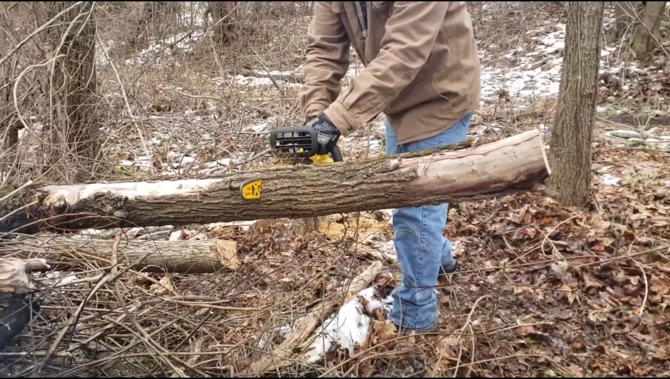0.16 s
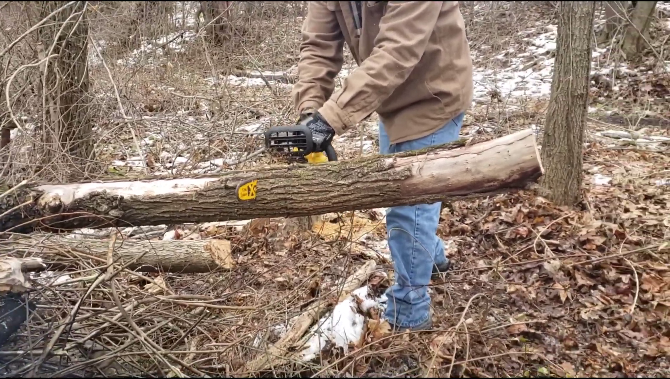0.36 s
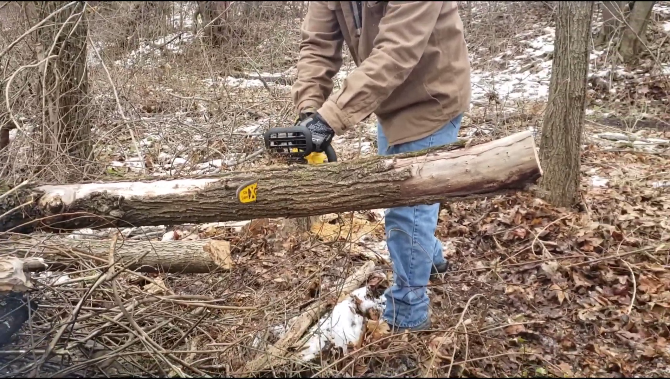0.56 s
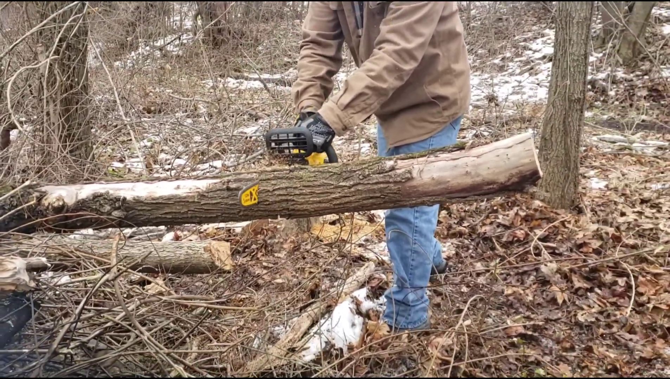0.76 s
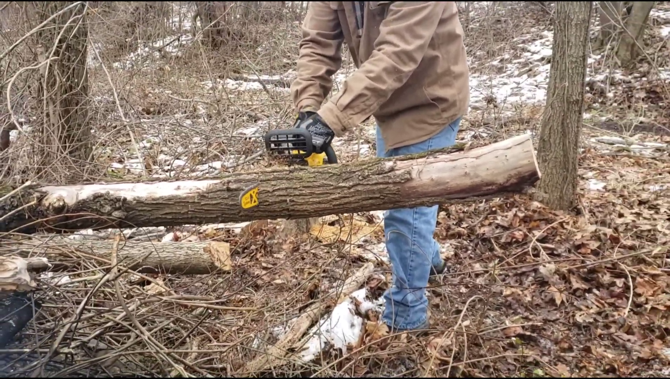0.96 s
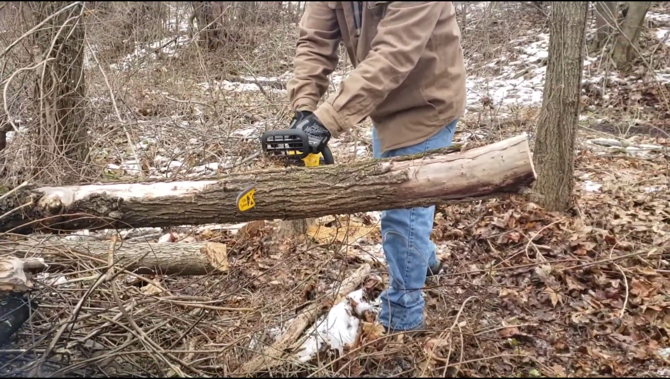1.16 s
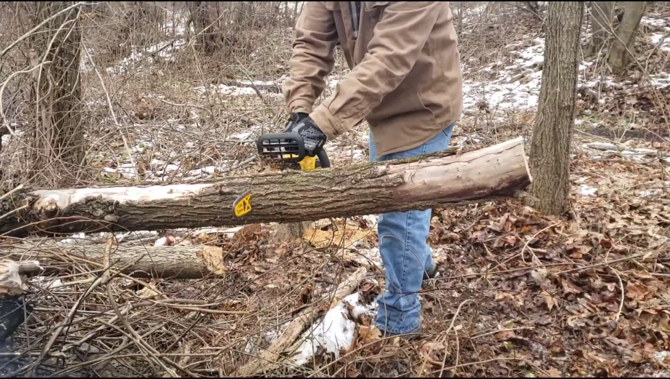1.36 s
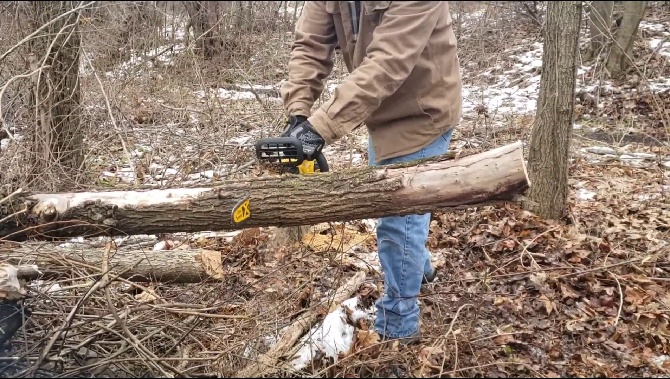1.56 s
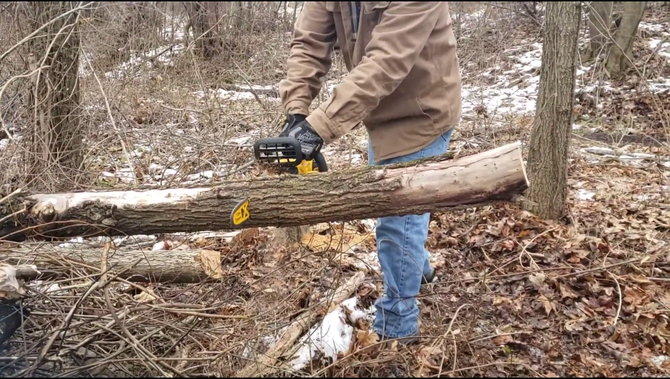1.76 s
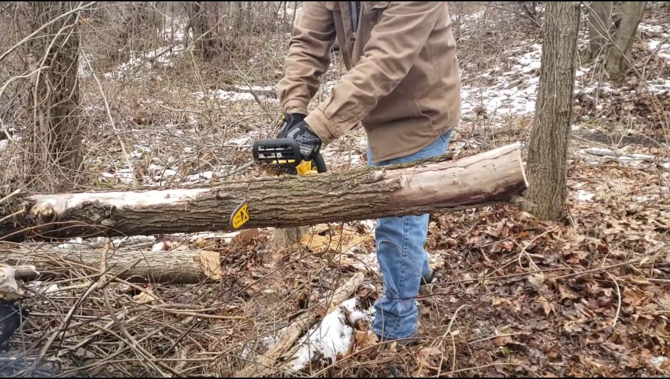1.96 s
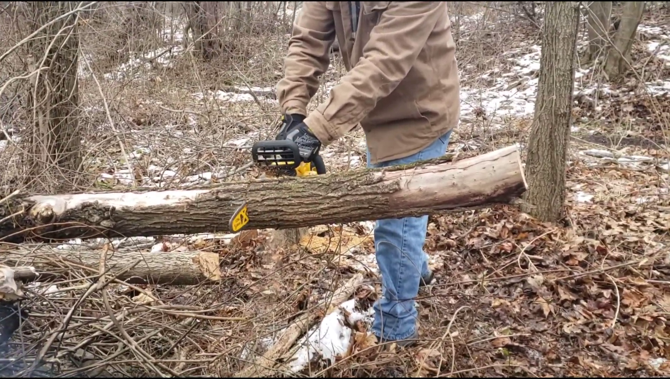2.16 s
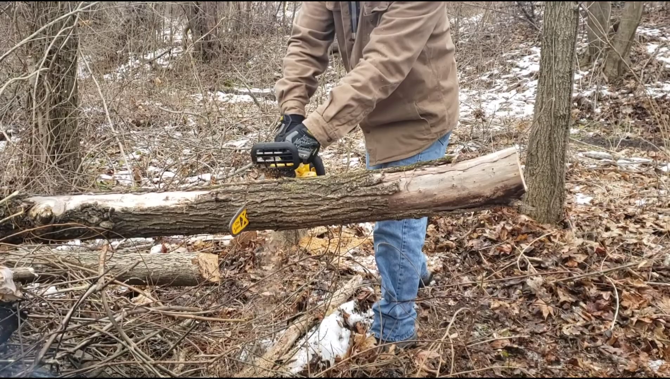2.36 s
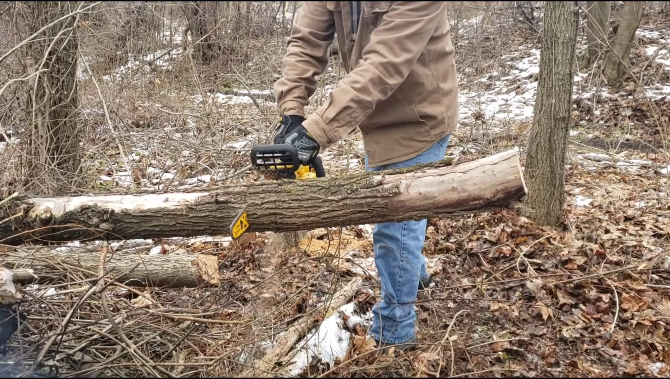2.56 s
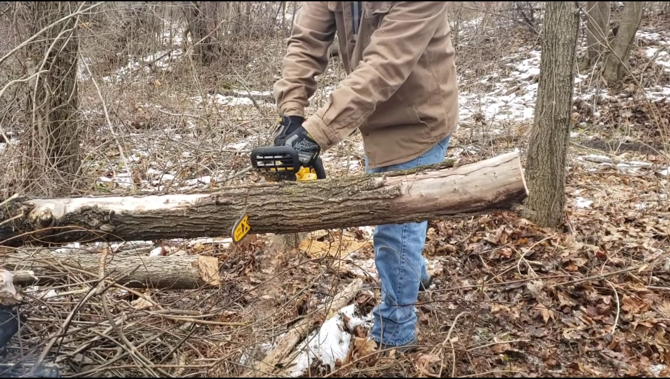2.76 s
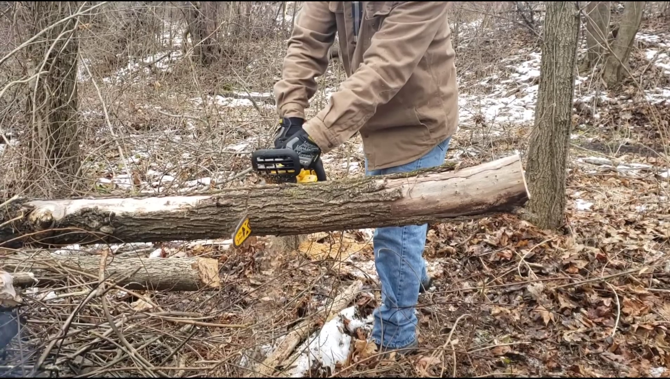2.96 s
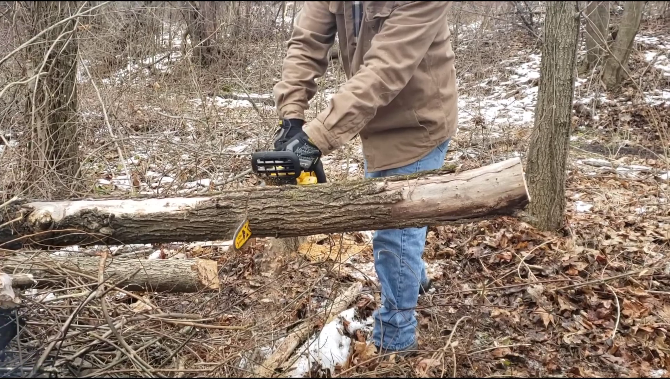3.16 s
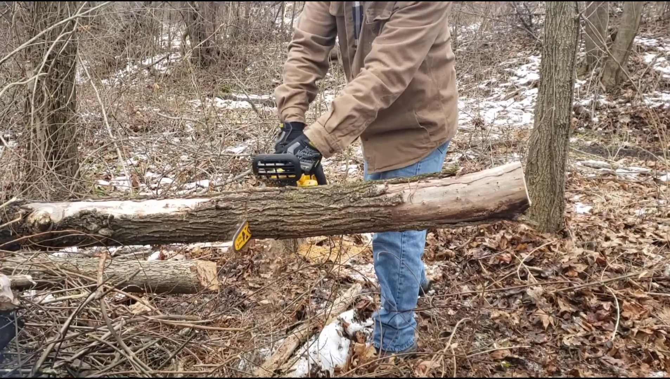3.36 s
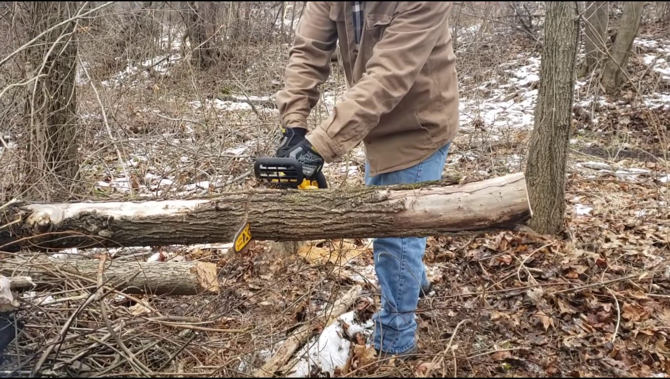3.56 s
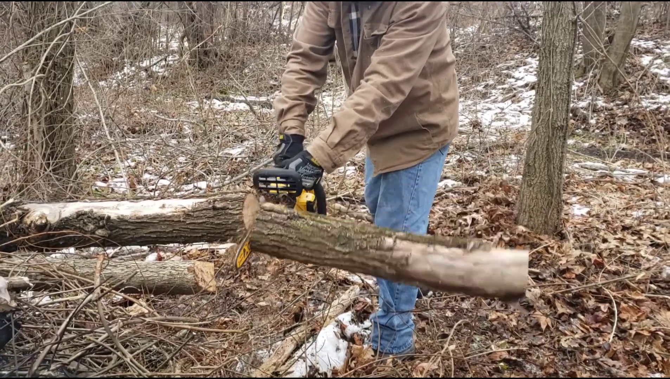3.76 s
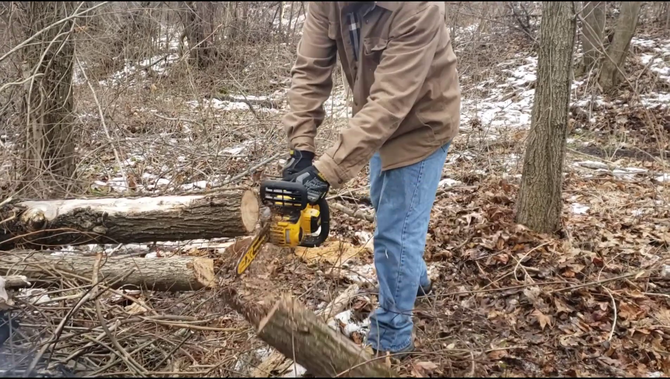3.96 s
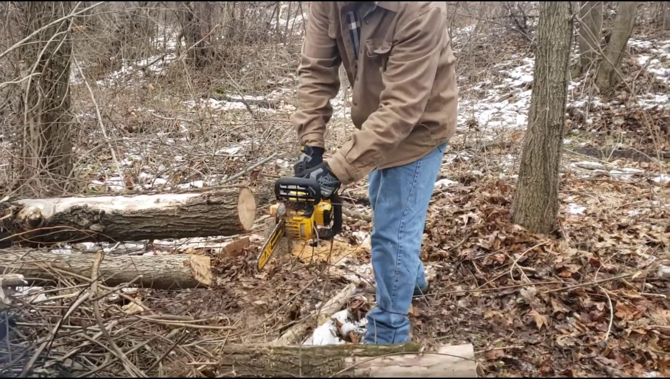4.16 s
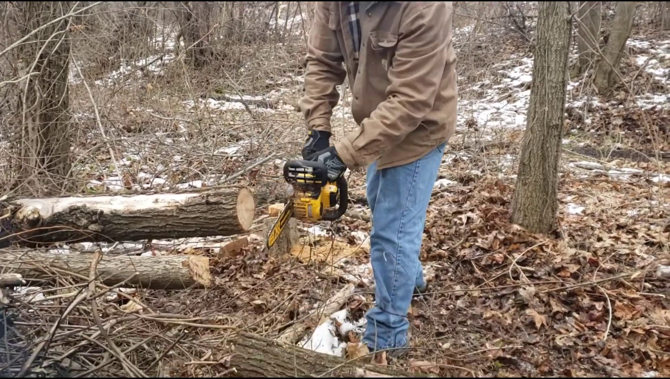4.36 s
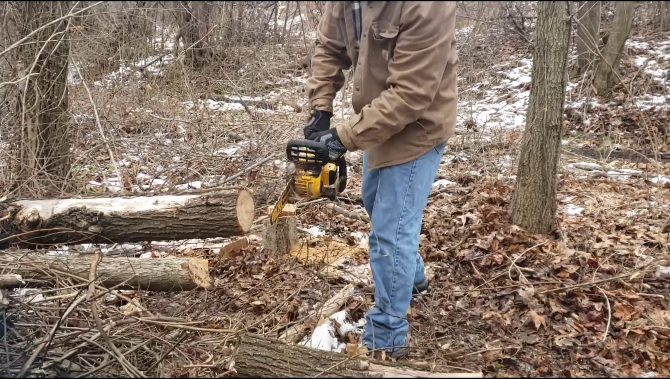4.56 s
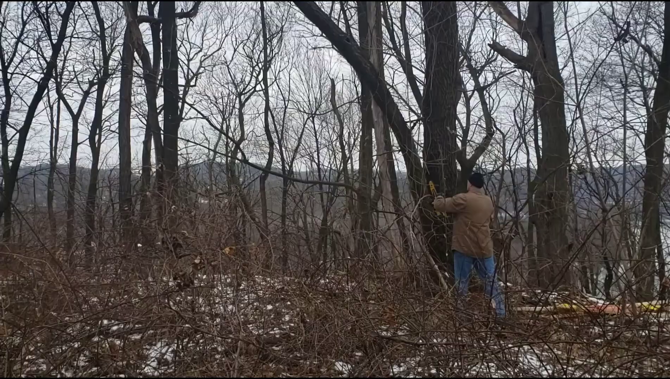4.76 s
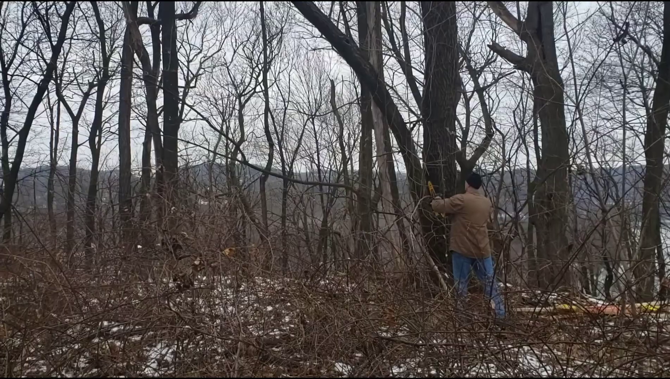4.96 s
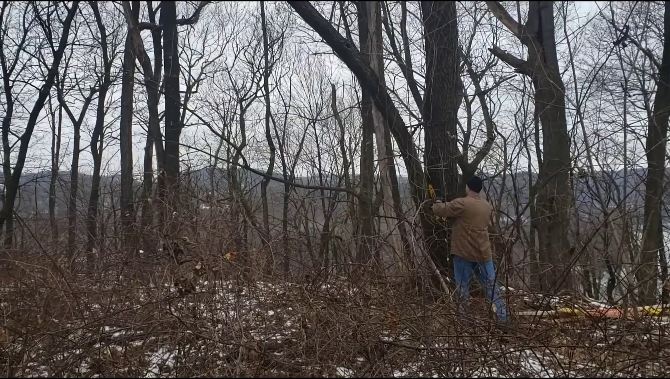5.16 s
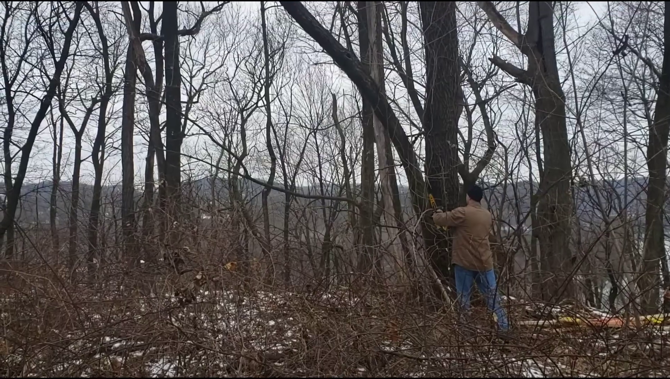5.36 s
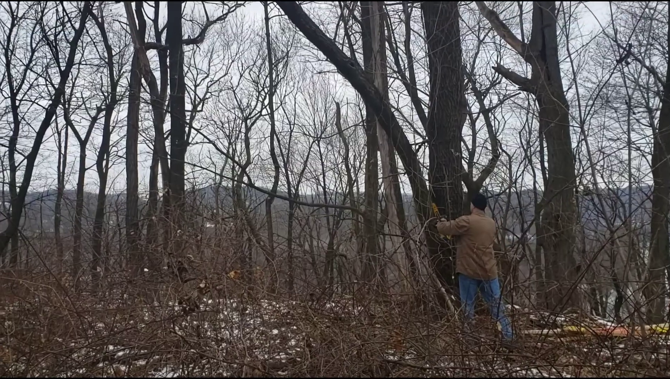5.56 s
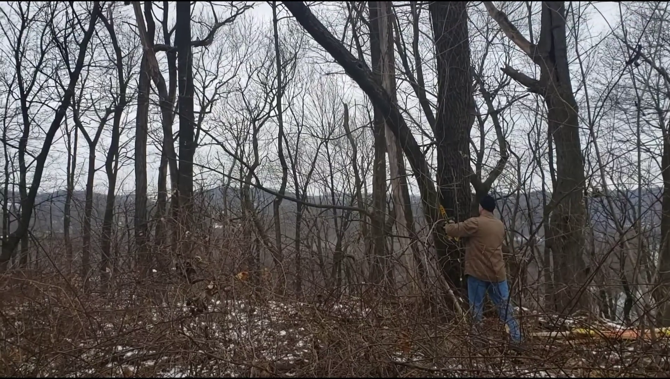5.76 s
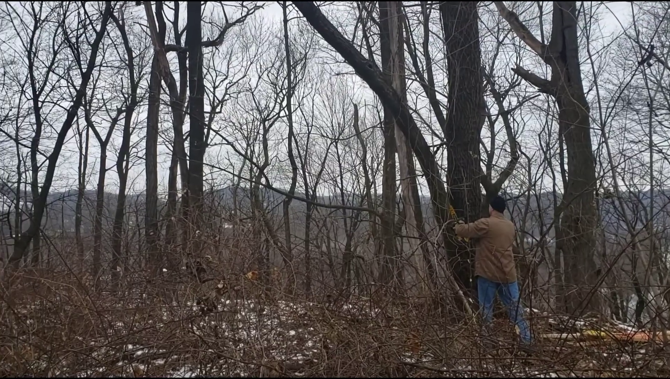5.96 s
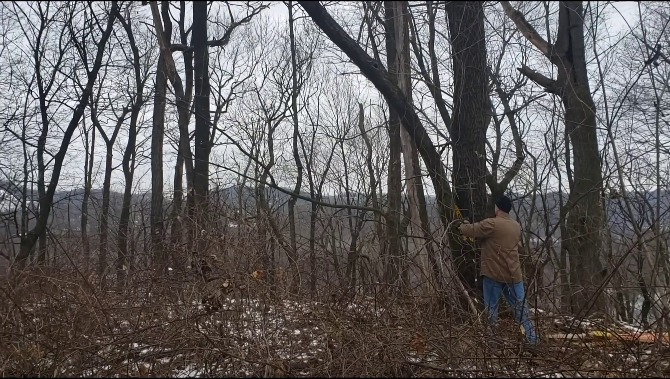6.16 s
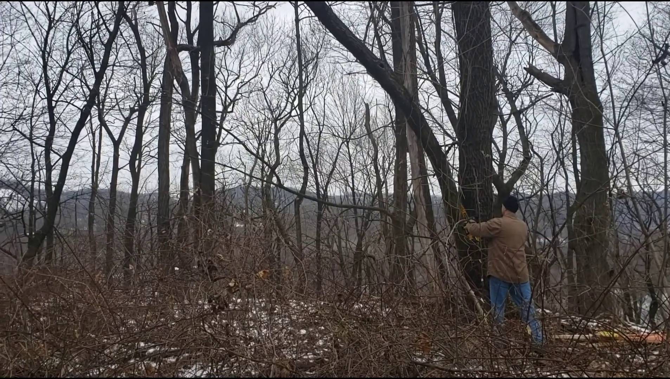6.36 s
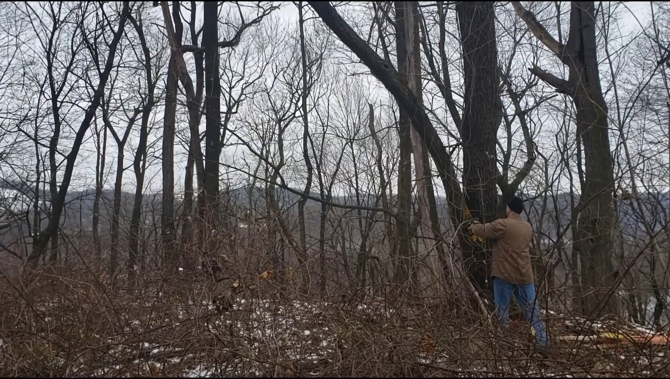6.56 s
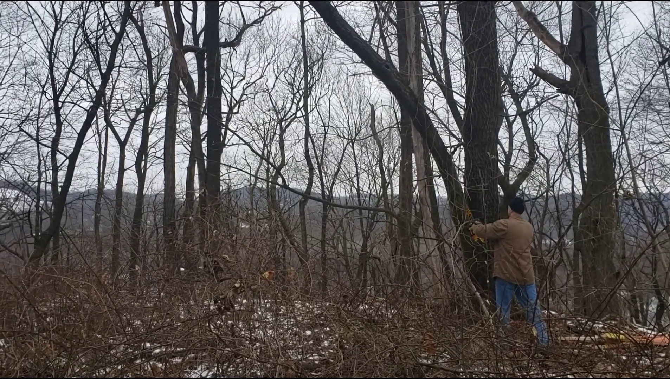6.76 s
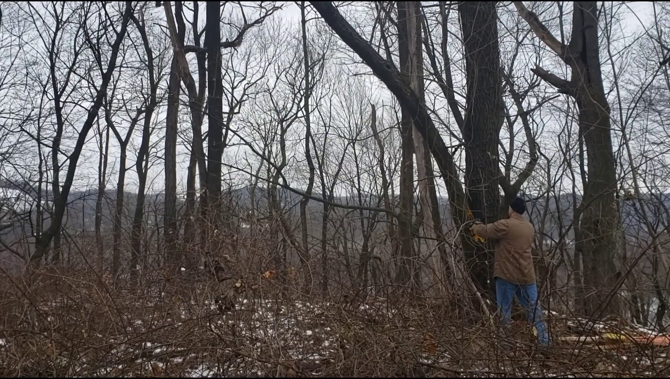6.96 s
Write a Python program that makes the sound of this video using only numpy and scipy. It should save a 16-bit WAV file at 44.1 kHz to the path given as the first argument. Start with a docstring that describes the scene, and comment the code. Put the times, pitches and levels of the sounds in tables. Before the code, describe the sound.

Outdoors in bare woods, a battery chainsaw cuts a log close to the microphone: rough, lumpy chatter with a high, unsteady gear whine and faint bar singing. As the log gives way the chain speeds up, wood cracks sharply and the saw stops. Dry leaves rustle and settle. After a tiny hush, the saw resumes more quietly and evenly on a tree farther off, over low distant wash.

```python
"""Chainsaw in bare woods

A cordless chainsaw cuts a log, runs up as the wood parts and stops; the log end lands in dry leaves.
After a brief hush the same saw bites into a standing tree, farther off. One chain speed drives the
cutter chatter (shaped noise), the link hum and the gear whine (sines). The cutters judder, the bar
sings, wood snaps and leaves rustle in noise and decaying tones, over a low wash of filtered noise."""
import sys
import numpy as np
from scipy import signal
from scipy.fft import rfft, irfft, next_fast_len
from scipy.io import wavfile
from scipy.ndimage import uniform_filter1d

SR = 44100
rng = np.random.default_rng(int(sys.argv[2]) if len(sys.argv) > 2 else 0)


def transcribe(u):
    """Save the signal u as a 16-bit wav file named by the first command-line argument.

    u: samples, shape (n,) or (channels, n), limited to [-1, 1]; the rate is SR.
    q: integer samples, one column per channel.
    """
    v = np.clip(np.atleast_2d(u).T, -1, 1)
    q = np.round(v * 32767).astype(np.int16)
    wavfile.write(sys.argv[1], SR, q)


N = 309141
TIME = np.arange(N) / SR  # s
FFT_SIZE, FFT_OVERLAP = 1024, 768  # samples
HZ = np.fft.rfftfreq(FFT_SIZE, 1 / SR)
FADE_SAMPLES = 1000  # tail added to a sound for its closing fade

# Chain through the log: (time [s], drive links passing [Hz], cutting level [dB], whine level before trims [dB])
LOG_CUT = [(0.0, 246.3, -25.5, -25.5), (0.9, 243, -27, -21), (1.5, 245.3, -27.5, -22),
           (2.1, 242.1, -26.5, -24), (2.7, 238.6, -27, -26), (3.1, 239.5, -27.5, -34),
           (3.17, 247.6, -27.7, -25), (3.4, 251.8, -27.5, -22), (3.6, 240.6, -27.0, -25.5),
           (3.68, 245, -27, -27), (3.79, 261.7, -26.5, -27.5), (3.84, 284, -27, -36),
           (3.89, 292.7, -25.6, -34), (3.94, 314, -27.5, -44), (4.05, 322, -26.5, -40),
           (4.09, 318, -32.5, -40), (4.145, 312, -34, -40), (4.17, 300, -47, -40)]
# Relative colour of the log cutting: (frequency [Hz], left [dB], right [dB])
LOG_COLOUR = [(100, -22, -20.5), (228, -23, -20), (300, -26, -23.5), (437, -24.5, -21.5), (500, -11, -8.5),
              (1150, -15, -10), (2010, -15.5, -8), (2780, -17, -2), (3440, -18.5, -12.5),
              (4350, -18.5, -20), (6550, -20.5, -20), (8550, -16, -24.5), (9200, -30, -28),
              (12000, -14.5, -16.5), (13800, -23, -22.5)]
# Likeness of left and right in the log cutting: (frequency [Hz], likeness [0-1])
LOG_LIKENESS = [(300, 0.96), (1200, 1), (1900, 0.68), (2600, 0.67), (4000, 0.46), (14000, 0)]
# Trim of each tone, in the order of TONE_MULTIPLES; the first adds to the whine curve:
# (left [dB], right [dB], change as the bar sinks in [dB/s])
LOG_TONES = [(-14, 0.3, 0), (-41.5, -56, 1), (-38, -55, 1), (-61, -59, 1), (-41.5, -39, -2.3),
             (-46, -41, -.8), (-46, -43, 0), (-53, -55, 0), (-49, -44.5, 0), (-72, -72, 0), (-63, -61, 0)]
# Bands where a crossing tone swells or dips: (frequency [Hz], width [Hz], lift [dB])
LOG_BANDS = [(243, 4, 7), (280, 36, -8), (319, 14, 12.5), (585, 24, 15), (755, 20, -13), (868, 50, 14),
             (950, 40, -10), (1910, 50, 15), (7100, 700, -12)]


def near_cut():
    """The log close by: a strong, lumpy cut with an unsteady gear whine."""
    return saw(LOG_CUT, LOG_COLOUR, LOG_LIKENESS, LOG_TONES, LOG_BANDS, hiss_db=-3.5, lag_s=.00011,
               gating=0.08, chip_share=0.15, lumpy_db=1.06, wobble=0.014, jitter=0.0072,
               flutter_db=2.6, housing_hz=8726)


# Chain in the tree: (time [s], drive links passing [Hz], cutting level [dB], whine level before trims [dB])
TREE_CUT = [(4.78, 323.3, -36, -43.5), (5.05, 327, -36.5, -40.5), (5.35, 328, -36, -57),
            (5.65, 329, -36.5, -55), (5.8, 322.8, -35, -57), (6.18, 316.2, -35.5, -52),
            (6.3, 290, -35, -43), (6.4, 290, -34.5, -41.5), (6.48, 298, -34.5, -42),
            (6.56, 303, -34.5, -47), (6.85, 302.5, -31, -43), (7.0, 301.5, -32.5, -42)]
# Relative colour of the tree cutting: (frequency [Hz], left [dB], right [dB])
TREE_COLOUR = [(230, -36, -32), (396, -28, -21.5), (520, -21, -14), (620, -14.5, -7.5), (1400, -16.5, -11),
               (1870, -19, -2), (2080, -16, -7), (2400, -14, -3.5), (2780, -16, -15), (3200, -13, -12),
               (3760, -8.5, -5.5), (4530, -12.5, -15.5), (5200, -11, -13), (6500, -22, -20.5),
               (8040, -10, -13), (9200, -25, -27.5), (11740, -20, -6), (13600, -27.5, -12)]
# Likeness of left and right in the tree cutting: (frequency [Hz], likeness [0-1])
TREE_LIKENESS = [(300, 0.69), (700, 0.89), (3000, 0.63), (7900, 0.52), (11000, 0.43), (14000, 0.23)]
# Trim of each tone, in the order of TONE_MULTIPLES; the first adds to the whine curve:
# (left [dB], right [dB], change as the bar sinks in [dB/s])
TREE_TONES = [(-16, 4, 0), (-60.7, -66, 0), (-57, -42.5, 0), (-63, -57.5, 0), (-58, -52, 0),
              (-51, -43, 3.2), (-57, -55, 2), (-62, -58, 0), (-48, -46.5, 0), (-56, -53, -6),
              (-56, -51, -6)]
# Bands where a crossing tone swells or dips: (frequency [Hz], width [Hz], lift [dB])
TREE_BANDS = [(328.5, 5, -11), (653, 44, 14), (980, 50, -7), (1635, 100, 13), (1925, 40, 3),
              (7900, 660, 22)]


def far_cut():
    """The standing tree farther off: a quieter, more even cut that pulses more with the links."""
    return saw(TREE_CUT, TREE_COLOUR, TREE_LIKENESS, TREE_TONES, TREE_BANDS, hiss_db=0.1, lag_s=-.00011,
               gating=0.21, chip_share=.12, lumpy_db=.4, wobble=0.0061, jitter=.004,
               flutter_db=1.1, housing_hz=11850)


# Tones: gear mesh, its two overtones, then the link hum: (multiple of the link rate)
TONE_MULTIPLES = [73 / 6, 73 / 3, 73 / 2, 1, 2, 3, 4, 5, 6, 10 / 3, 11 / 3]
# Resonances of the steel bar under the chain: (frequency [Hz], width [Hz], lift [dB])
BAR_RINGS = [(1407, 150, 3), (1850, 96, 4)]
# The motor bogs briefly: (time [s], share of gear speed lost [0-1])
SNAGS = [(1.07, .05), (1.25, .07), (1.45, .07), (2.115, .055), (2.555, .07)]
SNAG_S = .018  # half length of a snag
FREE_HZ = 325  # link rate with little load
HISS_DB_PER_OCTAVE = 14  # the chain hiss gains on the cutting as the chain speeds up
RELEASE_S, COAST_DB_PER_S, HISS_DROP_DB = 4.03, 270, 4.5  # trigger let go: tones die, hiss steps down
ROUGHER_PER_OCTAVE = 12  # speed jitter grows as the chain slows under load


def saw(rows, colour, likeness, tones, bands, hiss_db, lag_s, gating, chip_share, lumpy_db, wobble, jitter,
        flutter_db, housing_hz):
    """Cutter chatter below, chain hiss above, link hum and a gear whine that wobbles once a sprocket turn."""
    (link_hz, cut_db, whine_db), start = play(rows)
    n = len(link_hz)
    t = TIME[start:start + n]
    coast_db = COAST_DB_PER_S * np.maximum(t - RELEASE_S, 0) * (t[0] < RELEASE_S)
    hiss_gain_db = HISS_DB_PER_OCTAVE * np.log2(link_hz / FREE_HZ)
    hiss_level_db = cut_db + hiss_db + hiss_gain_db - np.minimum(coast_db, HISS_DROP_DB)
    load = 1 + ROUGHER_PER_OCTAVE * np.maximum(np.log2(link_hz[0] / link_hz), 0)  # slower than at the start
    turns = np.cumsum(link_hz * (1 + 0.354 * jitter * load * drift(18, n))) / SR  # links passed

    rings_db = sum(db / (1 + (2 * (HZ - hz) / width) ** 2) for hz, width, db in BAR_RINGS)
    drive, other = chatter(turns, gating, chip_share, lumpy_db)
    spectrum, right_gain = stereo(drive, other, read(colour, HZ) + rings_db, likeness, lag_s, patchy_db=1.49)
    high = np.clip((HZ - 3000) / 3000, 0, 1)[:, None]  # the hiss takes over from the cutting in the treble
    low_share = np.sqrt(1 - high)
    low_power = (right_gain[(HZ > 450) & (HZ < 2300)] ** 2).sum() / len(HZ)
    high_power = (right_gain[(HZ > 9500) & (HZ < 15500)] ** 2).sum() / len(HZ)
    out = back_to_sound(spectrum * low_share, n) * gain_of(cut_db) / np.sqrt(low_power)
    out += back_to_sound(spectrum * (1 - low_share), n) * gain_of(hiss_level_db) / np.sqrt(high_power)

    # the motor side of the gear feels each cutter bite, so its speed is less even than the chain's
    uneven = wobble * np.sin(2 * np.pi * turns / 6) + jitter * load * drift(61.7, n)
    uneven -= sum(share * np.exp(-((t - s) / SNAG_S) ** 2) for s, share in SNAGS)
    gear_turns = turns + np.cumsum(link_hz * uneven) / SR
    mesh, top = TONE_MULTIPLES[0], max(TONE_MULTIPLES)
    for k, (left_db, right_db, db_per_s) in zip(TONE_MULTIPLES, tones):
        tone_turns = gear_turns if k >= mesh else turns
        phase = 2 * np.pi * (k * tone_turns + rng.random())
        lift_db = sum(db / (1 + (2 * (k * link_hz - hz) / width) ** 4) for hz, width, db in bands)
        level_db = lift_db + db_per_s * (t - t[0]) - coast_db + whine_db * (k == mesh)
        flutter = flutter_db * (drift(36, n) - 0.12 * flutter_db)
        size = np.sqrt(2) * gain_of(level_db + flutter)
        if k > mesh:  # each link entering the sprocket shakes the overtones
            size *= 1 + 0.35 * np.cos(2 * np.pi * turns)
        if k == top:  # the top overtone stands out where it meets a ring of the housing
            size /= 1 + ((k * link_hz * (1 + uneven) - housing_hz) / 220) ** 2
        out[0] += gain_of(left_db) * size * np.sin(phase)
        out[1] += gain_of(right_db) * size * np.sin(phase - 2 * np.pi * k * link_hz * lag_s)
    return placed(out, start)


def chatter(turns, gating, chip_share, lumpy_db):
    """Two scraping noises that swell with the passing links, with sparse chips torn off the wood."""
    n = len(turns)
    swell = 1 + gating * np.cos(2 * np.pi * turns) + 0.23 * gating * np.cos(2 * np.pi * turns * 2 / 3)
    lumps = gain_of(lumpy_db * (drift(30, n) + 0.26 * drift(8, n)))  # the chain grabs and lets go
    chips = crackle(per_s=400, spread_db=2.7, ring_s=0.00055, size=n)
    return lumps * (swell + chip_share * chips) * rng.standard_normal((2, n))


JUDDER_S, JUDDER_PER_S = (2.862, 2.97), 59  # from and to, knock rate
JUDDER_DB = -17.5  # knock level before force, random spread and channel trims
LOG_RING_HZ, LOG_RING_T60_S = 960, .02  # centre of the scattered pitches, decay by 60 dB


def judder():
    """The cutters knock in the kerf: each knock rings the log as a decaying sine, strongest mid-run."""
    out, t = np.zeros(N), np.arange(2000) / SR
    times = np.arange(*JUDDER_S, 1 / JUDDER_PER_S)
    forces = np.sin(np.pi * (np.arange(len(times)) + 1) / (len(times) + 1))
    for s, force in zip(times, forces):
        pitch, db = rng.standard_normal(2)
        knock = np.sin(2 * np.pi * LOG_RING_HZ * (1 + .05 * pitch) * t) * gain_of(-60 * t / LOG_RING_T60_S)
        out[round(s * SR):][:len(t)] += force * gain_of(JUDDER_DB + 1.5 * db) * knock
    return gain_of([[-3], [1.5]]) * out


# The pinched bar singing on a higher ring: (time [s], level before channel trims [dB])
BAR_SONG = [(0, -32), (1.2, -30), (2.4, -31), (2.65, -27.5), (3.1, -28.5), (3.2, -35), (3.73, -30),
            (3.78, -25.5), (3.83, -36), (4.1, -39)]


def bar_song():
    """A narrow bar resonance kept ringing by random bites: a tone of wandering size and phase."""
    (level_db,), start = play(BAR_SONG)
    n = len(level_db)
    wander = drift(48, n) + 1j * drift(50, n)
    tone = (wander * np.exp(2j * np.pi * 2400 * TIME[:n])).real
    return placed(gain_of(level_db + np.array([[-11], [-1.5]])) * tone, start)


# Twigs and fibres snapping: (time [s], peak [dB], left minus right [dB], pitch [Hz], decay by 60 dB [s])
SNAPS = [(3.7194, -17, 1, 6000, .01), (4.029, -17, 3, 7000, .012), (4.0344, -12, 6, 8050, 0.014),
         (4.0383, -8, 4, 9000, 0.0028), (4.055, -18, -.6, 3500, 0.023), (4.128, -25, -1.2, 2500, .04),
         (4.339, -34, -2.2, 9000, 0.018), (4.4268, -35, -1, 11000, 0.011), (4.5073, -39.5, -4, 3500, .08),
         (4.6754, -38.5, -7, 2580, 0.063)]


def snaps():
    """Snapping wood: each snap is a dying burst of noise around its pitch."""
    out, t = np.zeros((2, N)), np.arange(4000) / SR
    for s, db, pan_db, hz, t60 in SNAPS:
        puff = rng.standard_normal((2, len(t)))
        b, a = signal.butter(1, [hz / 1.65, min(hz * 1.4, 20000)], "band", fs=SR)
        burst = signal.lfilter(b, a, (puff + 0.4 * puff[0]) * gain_of(-60 * t / t60))
        peak = gain_of(db + np.array([[pan_db], [-pan_db]]) / 2)
        out[:, round(s * SR):][:, :len(t)] += burst * peak / abs(burst).max(1, keepdims=True)
    return out


# Relative colour of the leaves: (frequency [Hz], left [dB], right [dB])
LEAF_COLOUR = [(280, -20, -15), (450, -10, -5), (1200, -5.5, -2), (2900, -14, 1.5), (3820, -16, -14),
               (5800, -8, -9), (7300, -9, -8), (8900, -16, -22), (11500, -16, -17), (13900, -14, -9)]
# Likeness of left and right in the leaves: (frequency [Hz], likeness [0-1])
LEAF_LIKENESS = [(300, .7), (1200, 0.18), (14000, 0.14)]
RUSTLE_S = (4.16, 4.74)  # leaves stir after the log end lands: from, to
RUSTLE_DB, SETTLED_DB, SETTLE_S = -43.5, -53.5, .17  # first level, level approached, time constant


def leaves():
    """Dry leaves: hiss with small crackles, settling after the fall."""
    start, end = (round(s * SR) for s in RUSTLE_S)
    n = end - start + FADE_SAMPLES
    level_db = SETTLED_DB + (RUSTLE_DB - SETTLED_DB) * np.exp(-TIME[:n] / SETTLE_S)
    crackles = crackle(per_s=150, spread_db=4, ring_s=0.0018, size=n)
    drive, other = (1 + 0.23 * crackles) * rng.standard_normal((2, n))
    spectrum, _ = stereo(drive, other, read(LEAF_COLOUR, HZ), LEAF_LIKENESS, lag_s=0, patchy_db=2.3)
    return placed(gain_of(level_db) * evened(back_to_sound(spectrum, n)), start)


# Colour of far traffic and wind: (frequency [Hz], relative level per Hz [dB])
RUMBLE_COLOUR = [(20, -28), (45, -6.5), (75, 0), (105, -5), (150, -16), (250, -24.5), (700, -63)]
# Swells of the wash: (time [s], half length [s], lift [dB])
RUMBLE_SWELLS = [(3.6, .13, 5), (4.07, .1, 5), (6.7, .5, 1.5)]
RUMBLE_DB, RUMBLE_RISE_DB_PER_S = -57.5, .9  # starting level before channel trims, steady climb


def rumble():
    """Low wash of filtered noise, nearly alike left and right, slowly rising, with a few swells."""
    shared, own = rng.standard_normal((2, N))
    size = next_fast_len(N)
    pair = rfft(np.array([shared, shared + .33 * own]), size)
    colour_db = read(RUMBLE_COLOUR, np.fft.rfftfreq(size, 1 / SR))
    wash = irfft(pair * gain_of(colour_db), size)[:, :N]
    swell_db = sum(db * np.exp(-((TIME - s) / half) ** 2) for s, half, db in RUMBLE_SWELLS)
    level_db = RUMBLE_DB + RUMBLE_RISE_DB_PER_S * TIME + swell_db
    return gain_of(level_db + np.array([[-1.1], [.6]])) * evened(wash)


def gain_of(db):
    """Decibels to gain."""
    return 10 ** (np.asarray(db) / 20)


def evened(x):
    """Scales to rms 1."""
    return x / np.sqrt(np.mean(x ** 2) + 1e-20)


def read(points, hz):
    """Reads every column of a table on a log-frequency axis."""
    f, *values = np.transpose(points)
    return np.array([np.interp(np.log(hz + 1), np.log(f + 1), v) for v in values])


def play(rows):
    """Columns of a time curve at every sample, with room for the fade, and its first sample."""
    s, *columns = np.transpose(rows)
    start = max(round(s[0] * SR), 0)
    t = TIME[start:round(s[-1] * SR) + FADE_SAMPLES]
    return [np.interp(t, s, c) for c in columns], start


def drift(hz, size):
    """Slow random wander of rms 1 with little above hz, made at 1/32 of the sample rate."""
    b, a = signal.butter(2, np.clip(hz, .1, 500), fs=SR / 32)
    slow = evened(signal.lfilter(b, a, rng.standard_normal(N // 32 + 2)))
    return np.interp(np.arange(size) / 32, np.arange(len(slow)), slow)


def crackle(per_s, spread_db, ring_s, size):
    """Envelope of sparse short bursts of uneven force, rms 1."""
    force, chance = rng.random((2, size))
    force_db = spread_db * np.minimum(-np.log(force + 1e-9), 4)
    hits = gain_of(force_db) * (chance < per_s / SR)
    return evened(signal.lfilter([1], [1, -np.exp(-1 / (ring_s * SR))], hits))


def stereo(drive, other, colour_db, likeness, lag_s, patchy_db):
    """Colours noise for left and right; the right mixes in an unrelated noise and lags by lag_s."""
    left, unrelated = (signal.stft(evened(x), nperseg=FFT_SIZE, noverlap=FFT_OVERLAP)[2]
                       for x in (drive, other))
    # random patches of level, smoothed over frequency and time
    patches = uniform_filter1d(rng.standard_normal(left.shape), size=7, axis=0)
    patches = evened(uniform_filter1d(patches, size=14, axis=1))
    c = np.clip(read(likeness, HZ)[0], 0, 1)[:, None]
    right = (c * left + np.sqrt(1 - c ** 2) * unrelated) * np.exp(-2j * np.pi * HZ * lag_s)[:, None]
    gain = gain_of(colour_db) * (HZ > 70)
    return np.array([left, right]) * gain[:, :, None] * gain_of(patchy_db * patches), gain[1]


def back_to_sound(spectrum, size):
    """Inverse short-time transform."""
    return signal.istft(spectrum, nperseg=FFT_SIZE, noverlap=FFT_OVERLAP)[1][:, :size]


def placed(sound, start):
    """Lays a sound into silence of full length, fading its end unless it runs to the end of the scene."""
    out, n = np.zeros((2, N)), sound.shape[1]
    fade = np.minimum((n - np.arange(n)) / FADE_SAMPLES, 1) if start + n < N else 1
    out[:, start:start + n] = sound * fade
    return out


def scene():
    """The near cut, the fall and the far cut over the background."""
    return near_cut() + far_cut() + judder() + bar_song() + snaps() + leaves() + rumble()


HUSH_S = (4.753, 4.7855)  # from, to: between the two places
EDGE_HZ = 15850


def record(dry):
    """A brief hush at a twentieth of the level between the two places, then a steep low-pass."""
    from_hush_s = np.maximum(HUSH_S[0] - TIME, TIME - HUSH_S[1])
    passing = np.clip(from_hush_s / 0.00082, .05, 1)
    low_pass = signal.firwin(511, EDGE_HZ, window=("kaiser", 9), fs=SR)
    return signal.oaconvolve(dry * passing, low_pass[None], "same")


dry = scene()
out = record(dry)
transcribe(out)
```